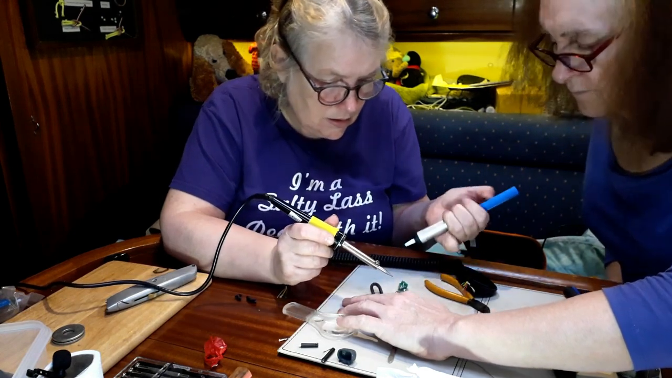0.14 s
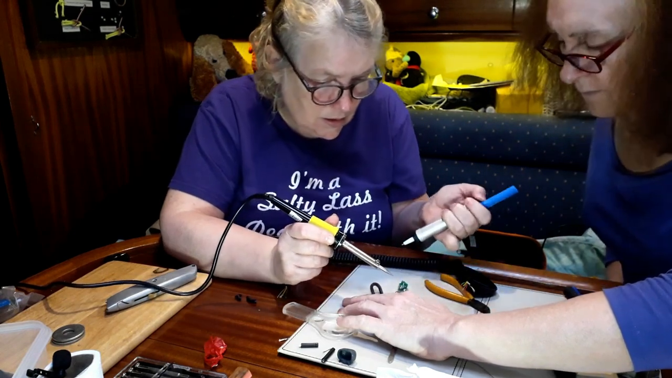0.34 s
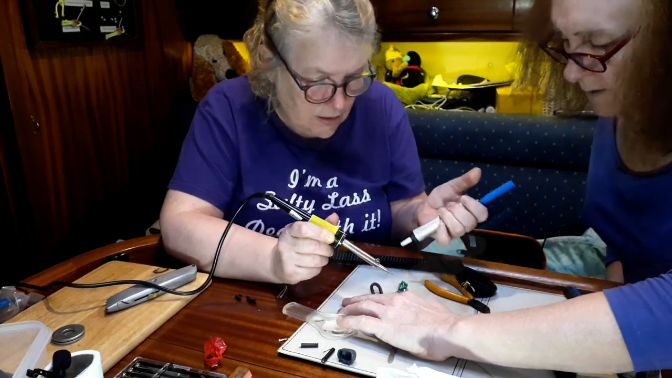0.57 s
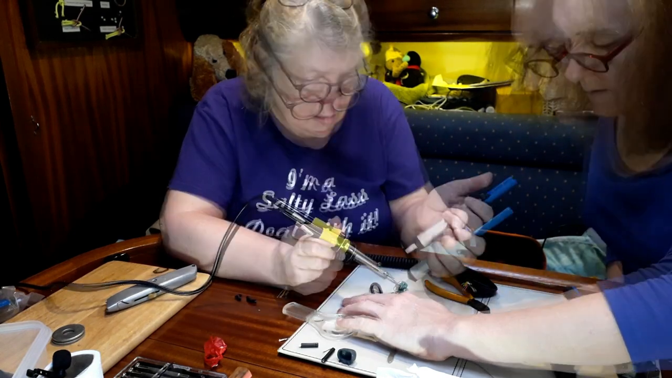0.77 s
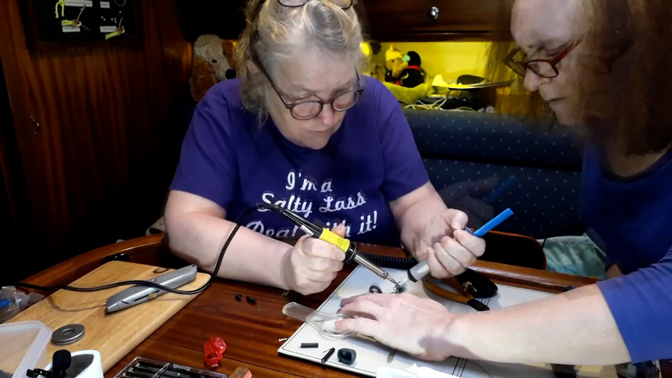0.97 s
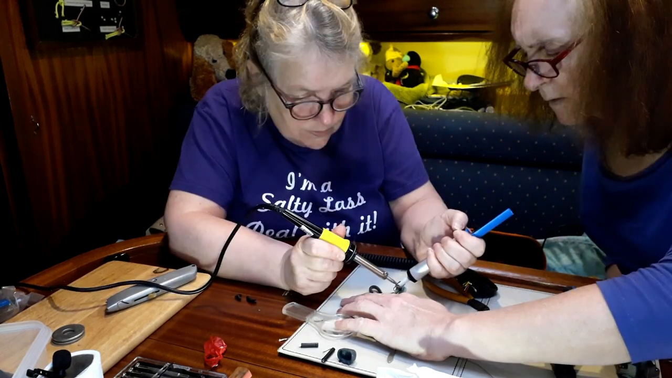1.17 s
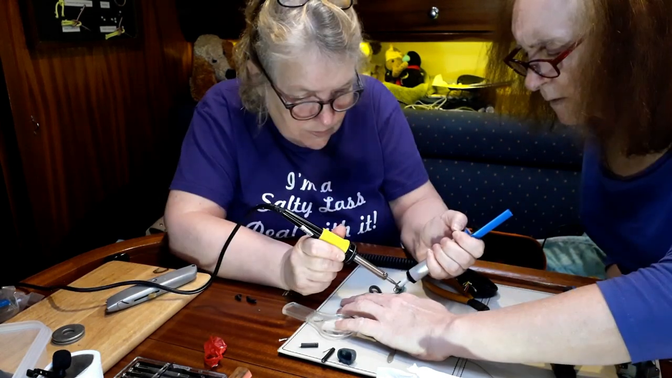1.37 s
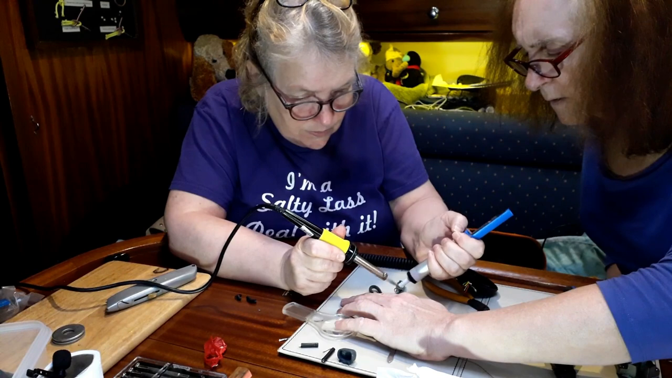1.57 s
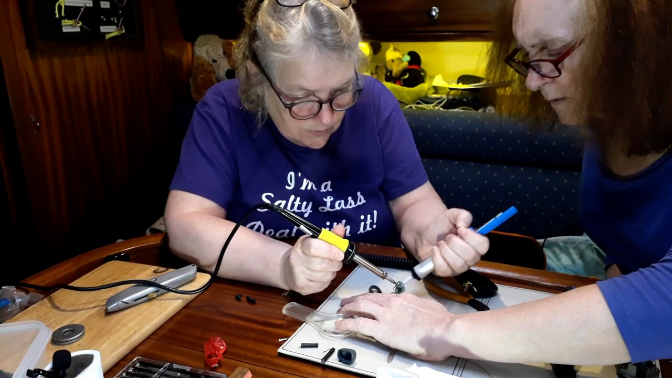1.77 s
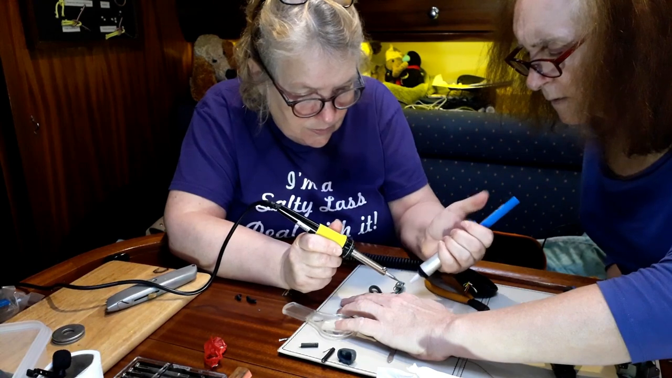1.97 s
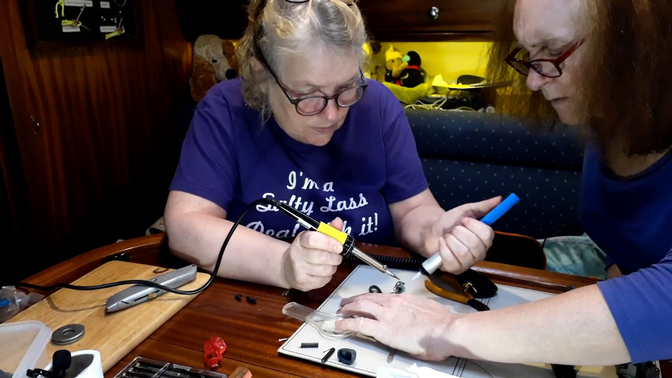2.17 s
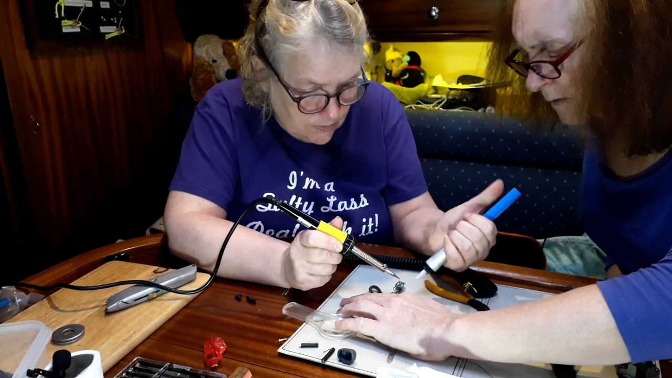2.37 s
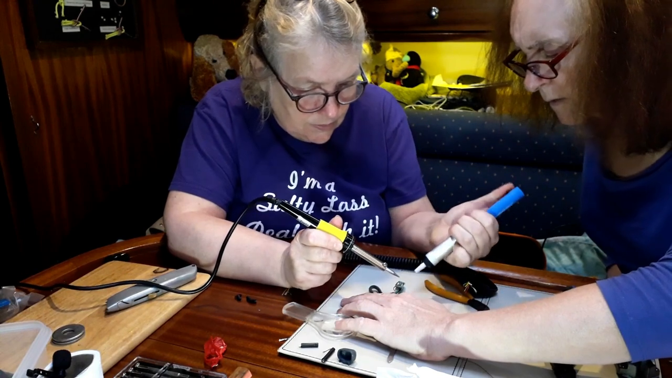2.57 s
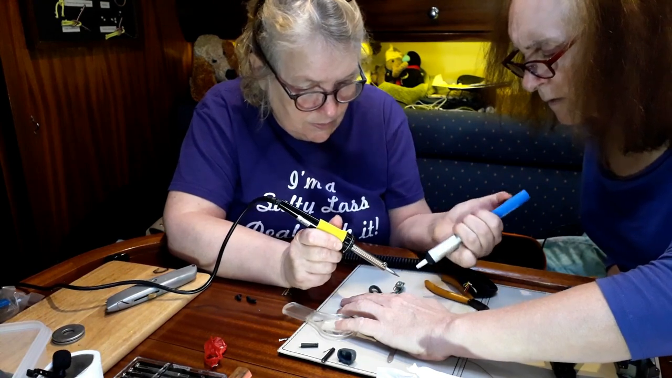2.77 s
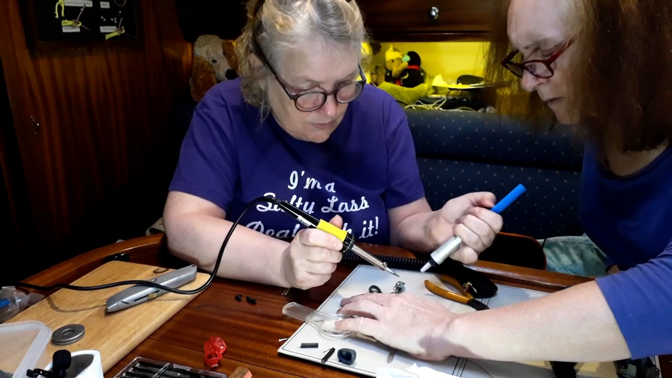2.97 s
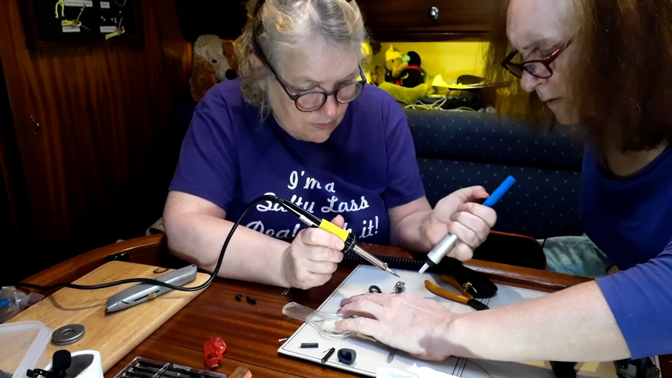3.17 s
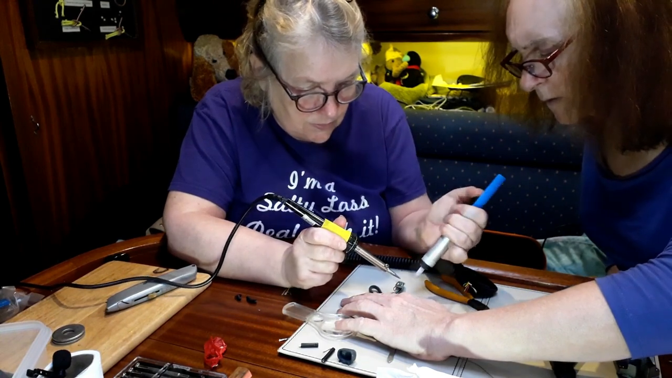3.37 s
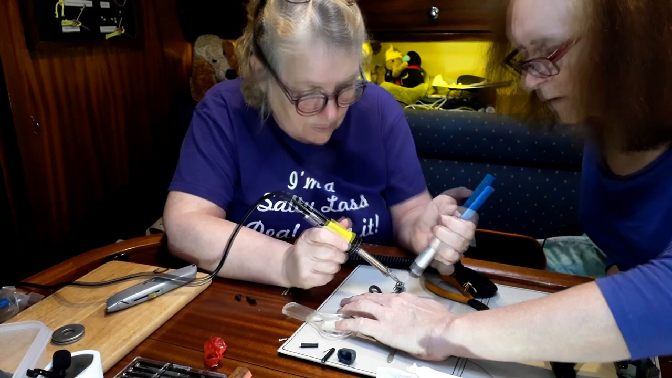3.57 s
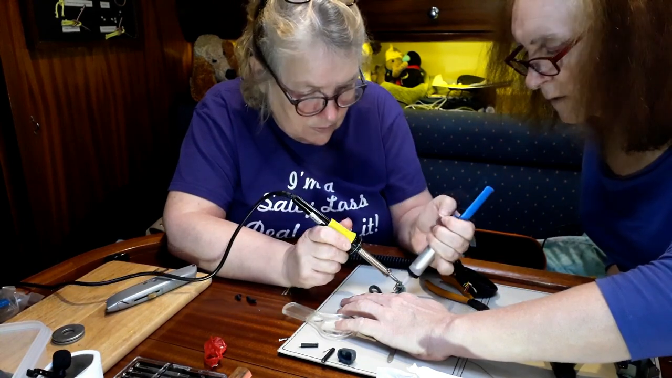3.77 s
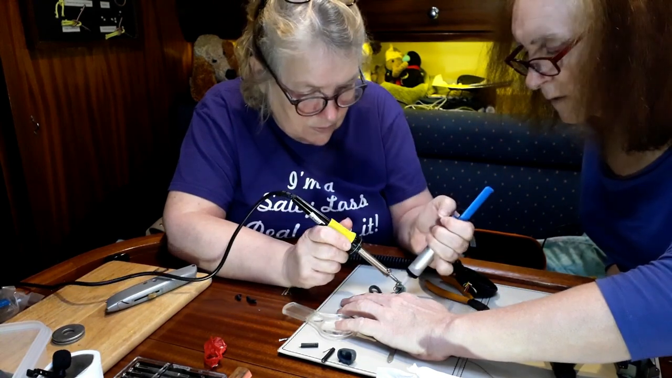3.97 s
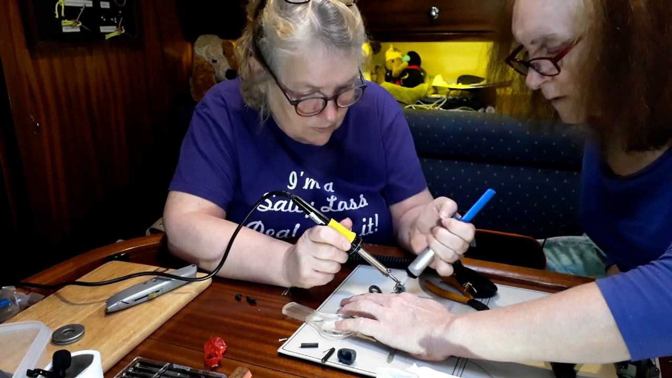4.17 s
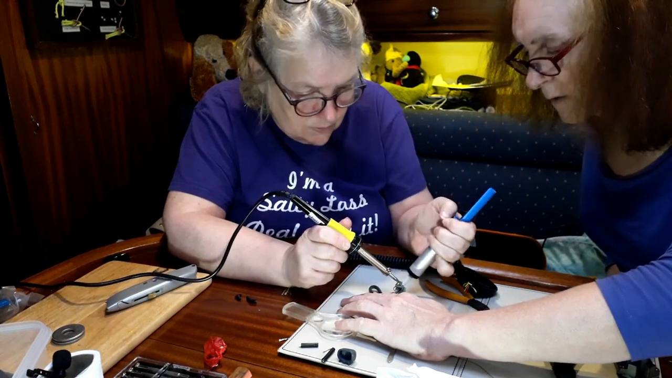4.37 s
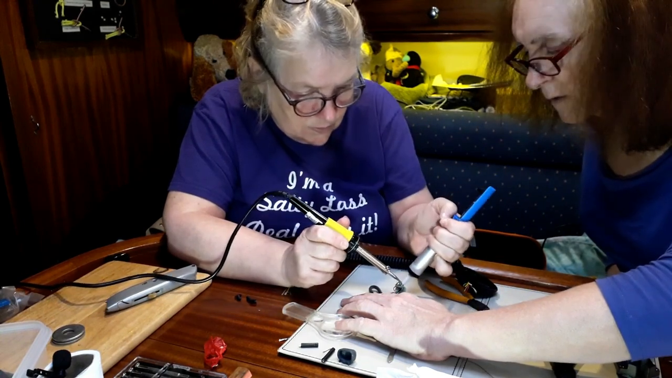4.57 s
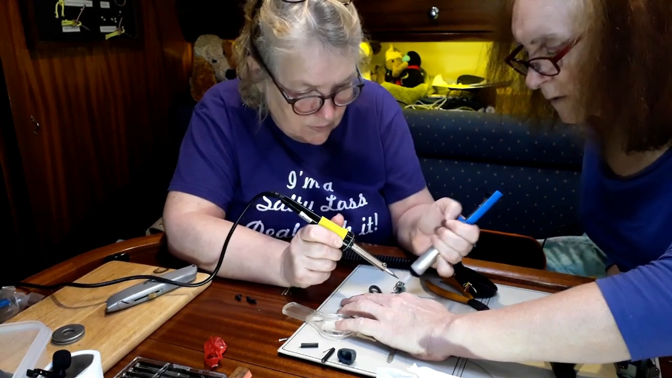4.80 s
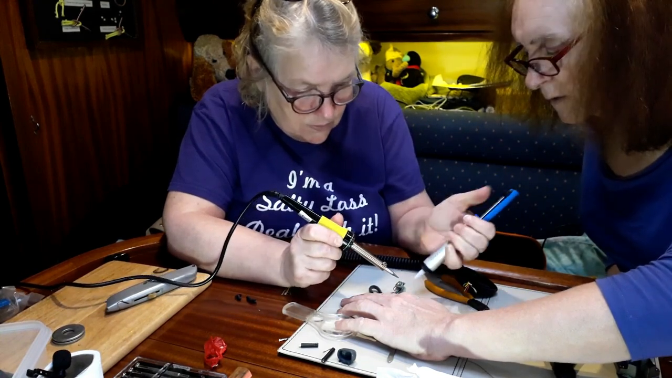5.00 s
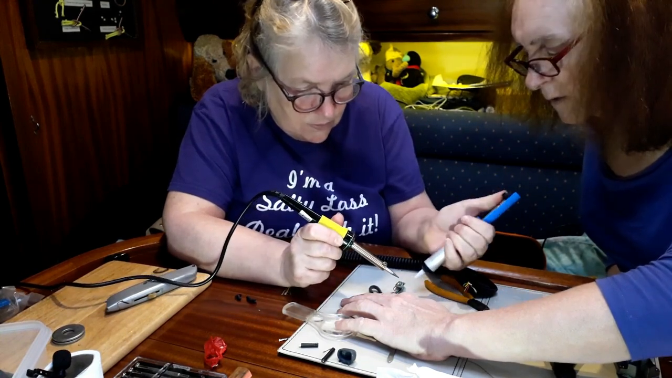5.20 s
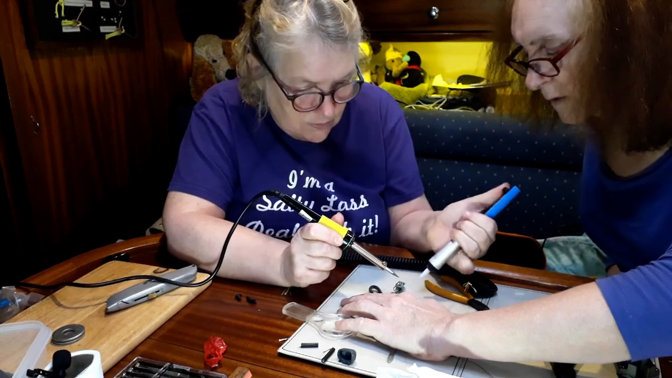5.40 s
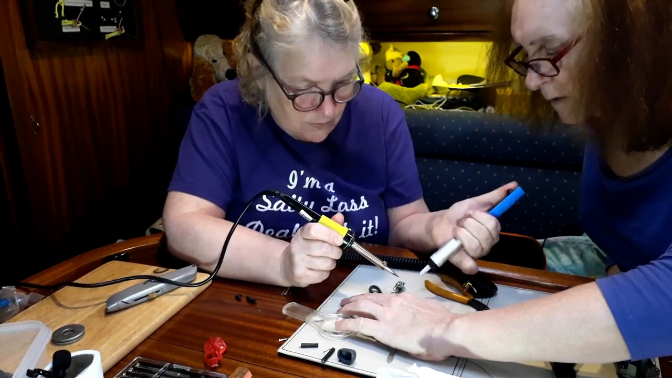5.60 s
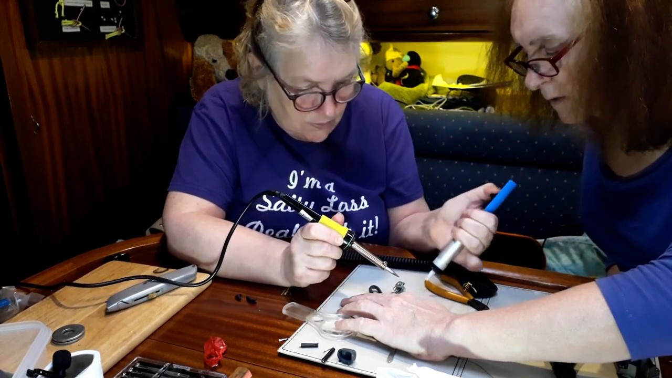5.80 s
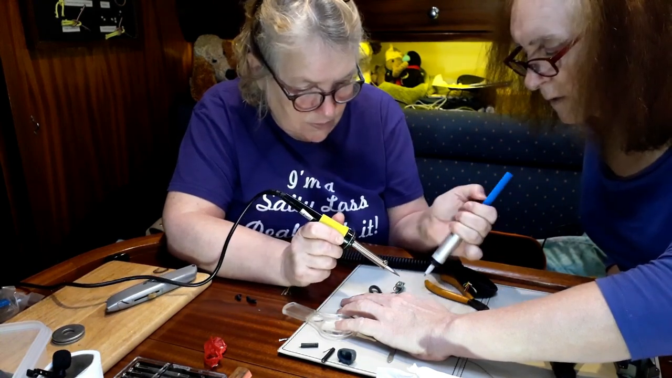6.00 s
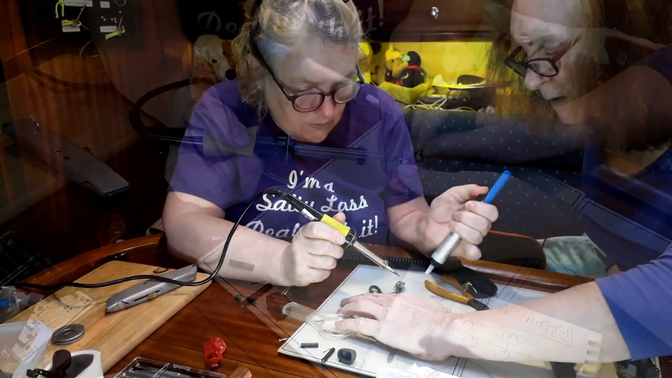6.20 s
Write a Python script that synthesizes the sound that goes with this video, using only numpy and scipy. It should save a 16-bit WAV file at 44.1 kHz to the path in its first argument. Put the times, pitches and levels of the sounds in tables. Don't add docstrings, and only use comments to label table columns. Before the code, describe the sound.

Very close stereo sound in a small wooden cabin, with short tight reflections. Faint low hum, soft cloth rustle and gently shifting hiss run throughout. It opens with a plunger already rubbing down its barrel; at 0.2 s it latches with a loud bright click, a lighter click follows at 0.3, and the knob clacks back at 0.43. Faint metal ticks come around 0.7-0.9. At 1.6 the piston releases in a hard snap, rattling briefly while the spring shivers away. Small ticks and scrapes gather from 2.2, with a clear sharp tick at 2.7. A lighter, squeakier slide begins at 2.75, latching at 3.0, with the knob returning at 3.2. A second, harder snap bursts at 4.46 with a quieter spring tail. Sparse faint ticks lead to a firmer slide at 5.73, the strong latch at 5.98 and a final knob clack at 6.2.

```python
import sys
import numpy as np
from scipy import signal
from scipy.fft import rfft, irfft
from scipy.io import wavfile
from scipy.ndimage import uniform_filter1d

SR = 44100
rng = np.random.default_rng(int(sys.argv[2]) if len(sys.argv) > 2 else 0)


def makeup_ratio(level_db):
    decades = np.asarray(level_db, float) / 20
    return 10 ** decades


def store_pcm(level_fs):
    pcm = np.round(np.clip(level_fs, -1, 1) * 32767).astype(np.int16)
    wavfile.write(sys.argv[1], SR, np.atleast_2d(pcm).T)


N = 275625
SPAN = 12000


def highpass(x, hz, order=2):
    return signal.sosfilt(signal.butter(order, hz, "high", fs=SR, output="sos"), x)


def decay(t, t60):
    return np.exp(-np.log(1000) * t / t60)


def gain_on(points, size, tilt_db=0.):
    hz = np.maximum(np.arange(size // 2 + 1) * SR / size, 10.)
    f, db = np.transpose(points)
    return np.log(makeup_ratio(np.interp(np.log(hz), np.log(f), db) + tilt_db * np.log2(hz / 3000)))


def causal(log_gain):
    cepstrum = irfft(log_gain)
    half = len(cepstrum) // 2
    cepstrum[1:half] *= 2
    cepstrum[half + 1:] = 0
    return irfft(np.exp(rfft(cepstrum)))


def unit(x):
    return x / np.sqrt(np.mean(x ** 2))


def noise(points):
    spectrum = rfft(rng.standard_normal(N + 1)) * np.exp(gain_on(points, N + 1))
    return unit(irfft(spectrum, N + 1)[:N])


def walk(rate):
    k = int(SR / rate)
    return unit(uniform_filter1d(uniform_filter1d(rng.standard_normal(N), k), k))


def even(x, size):
    colour = uniform_filter1d(np.abs(rfft(x)), size)
    return signal.fftconvolve(x, causal(-np.log(colour))[:len(x) // 4])[:len(x)]


# pitch_hz, level_db [per Hz]
HUM = [(12, -44), (20, -12), (32, -9.5), (81, -4), (157, 2), (188, -3), (223, -2), (250, -9), (356, -23),
       (380, -18), (450, -18), (580, -50.5), (990, -120)]
# pitch_hz, level_db [per Hz]
RUSTLE = [(150, -28.5), (250, -4), (354, -2.5), (530, -5), (630, -5.5), (820, -4), (1070, -17), (1800, -21),
          (2500, -18.5), (3250, -43), (5500, -120)]
# pitch_hz, level_db [per Hz]
HISS = [(710, -36.5), (1200, -4), (1320, -11.5), (1780, -2), (2530, -8), (3520, -2.5), (5450, 0.5),
        (15100, -2.5), (16000, -4.5), (16500, -30)]
# pitch_hz, level_db [per Hz]
AROUND = [(15, -37), (25, -3.5), (206, -2), (439, -5), (818, -9), (1370, -9.5), (2000, -10), (2350, -9.5),
          (5000, -6), (7920, -8), (14800, -8.5), (16000, -14)]
# time_s, level_db
GAIN = [(0, -66), (.6, -65.5), (1.04, -66), (1.1, -69.5), (1.55, -69.5), (1.8, -69), (1.95, -73),
        (2.64, -72.5), (2.75, -66.5), (3.15, -68), (3.41, -66), (3.83, -67), (3.88, -70), (4.7, -70),
        (4.92, -73), (5.67, -71.5), (6.1, -67.5), (6.25, -67.5)]
# middle_s, length_s, hum_db, rustle_db [swell]
STIRS = [(0.409, .4, -4.5, 3.5), (0.793, 0.35, -1.5, 8), (1.85, .3, -1.45, 7), (2.348, 0.49, 5, 5),
         (2.62, 0.22, -6.5, -4), (3.64, 0.1, 3, -3.7), (4.501, .5, 4, 2.5), (5.197, 0.38, 2, 0.6),
         (5.5, .15, -2.5, -1.2), (6.048, 0.5, 0, 2.5)]
HUM_DB, RUSTLE_DB = 1.5, -9.5


def cabin():
    t = np.arange(N) / SR
    hiss_db = np.interp(t, *np.transpose(GAIN))
    swell_db = np.zeros((2, N))
    for middle_s, length_s, *stir_db in STIRS:
        swell_db += np.outer(stir_db, np.exp(-(2 * (t - middle_s) / length_s) ** 2))
    hum = noise(HUM) * makeup_ratio(hiss_db + HUM_DB + swell_db[0] + 1.2 * walk(8))
    rustle = noise(RUSTLE) * makeup_ratio(hiss_db + RUSTLE_DB + swell_db[1] + 1.2 * walk(9))
    hiss = noise(HISS) * makeup_ratio(hiss_db - 2.3)
    return hum + rustle + hiss, noise(AROUND) * makeup_ratio(hiss_db - 6.0)


# delay_ms, level_db
ECHOES = [(2.1, -11), (5.6, -8), (9.5, -12.5), (14, -21.5)]
ROOM_T60_S, ROOM_DB = 0.085, 0.63
LATE_T60_S, LATE_DB = 0.31, -31.5


def room():
    t = np.arange(SPAN) / SR
    fade = decay(t, ROOM_T60_S) + makeup_ratio(LATE_DB) * decay(t, LATE_T60_S)
    tail = rng.standard_normal(SPAN) * (1 - np.exp(-t / 0.00047)) * fade
    path = makeup_ratio(ROOM_DB) * tail / np.sqrt(np.sum(tail ** 2))
    path[0] += 1
    echoes = np.zeros(SPAN)
    for delay_ms, db in ECHOES:
        echoes[int(delay_ms * SR / 1000)] = makeup_ratio(db)
    return even(path, size=16) + highpass(echoes, 900)


# start_s [slide], latch_s, latch_db, back_s [knob returns], back_db
STROKES = [
    (-.06, 0.2162, -5, .428, -14.5),
    (2.755, 2.9774, -3.5, 3.2042, -14),
    (5.732, 5.980, 0, 6.1998, -10),
]
# rub_db, squeak_db [bright part over the rub]
RUB_DB = [
    (-56, -6),
    (-58.5, -1.5),
    (-54, -7),
]
# pitch_hz, level_db [per Hz]
RUB = [(600, -39.5), (1100, -18), (1900, -7), (2500, -2.5), (3200, 4.2), (3900, 2), (4600, -7), (5200, 1.9),
       (6200, -8), (9000, -14.5), (12000, -26), (16000, -37.5)]
SLIDE_IN_S, SLIDE_IN_DB, EARLY_DB = 0.055, -10.5, -3
EASE_S, EASE_DB = .105, -5
COLUMN_DB, COLUMN_DB_PER_S = -64.5, 53.5
PATCHY_DB = 1.5


def slides(path):
    t = np.arange(N) / SR
    grain_db = 3.4 * np.minimum(rng.exponential(size=N), 7) + 1.2 * walk(60)
    grains = rng.standard_normal(N) * makeup_ratio(grain_db)
    seal = irfft(rfft(grains, N + 1) * np.exp(gain_on(RUB, N + 1)))[:N]
    edges_hz = (1000, 2600, 4400, 6000, 16000)
    rub = np.zeros(N)
    for band in zip(edges_hz, edges_hz[1:]):
        part = signal.sosfilt(signal.butter(2, band, "band", fs=SR, output="sos"), seal)
        rub += makeup_ratio(PATCHY_DB * walk(22)) * part
    rub = signal.fftconvolve(rub, path)[:N]
    squeak = unit(highpass(rub, 4800))
    rub = unit(rub)
    column = noise([(400, -22.5), (650, -5), (760, 3.0), (880, -4.5), (1300, -37.0)]) * makeup_ratio(4.2 * walk(40))
    out = np.zeros(N)
    for (start, end, *_), (force_db, squeak_db) in zip(STROKES, RUB_DB):
        on = uniform_filter1d(1. * (t >= start) * (t <= end), 300)
        bends_s = [start, start + SLIDE_IN_S, end - EASE_S, end]
        rub_db = force_db + np.interp(t, bends_s, [SLIDE_IN_DB, EARLY_DB, 0, EASE_DB])
        column_db = COLUMN_DB + COLUMN_DB_PER_S * np.clip(t - end, -1, 0)
        out += on * ((rub + makeup_ratio(squeak_db) * squeak) * makeup_ratio(rub_db) + column * makeup_ratio(column_db))
    return out


GRIP_S, LOOSE_GRIP_S = 0.038, .014
OWN_T60_S = .007


def blows(events, modes, crack, grip_s, direct_db, paths):
    out, t = np.zeros(N + SPAN), np.arange(2048) / SR
    grit = rng.standard_normal((len(events), 2048))
    luck = rng.standard_normal((len(events), 2, len(modes) + 1))
    for event, rough, chance, path in zip(events, grit, luck, paths * len(events)):
        s, db, contact_ms, tilt_db, ring_db, *own = event
        own_mode = [(*own, OWN_T60_S)] if own else []
        hz, mode_db, t60 = np.transpose(modes + own_mode)
        size_luck, pitch_luck = chance[:, :len(hz)]
        push = even(rough * np.exp(-t * 1000 / max(contact_ms, .05)), size=9)
        sizes = makeup_ratio(mode_db + 1.4 * size_luck + tilt_db * np.log2(hz / 3000))
        fade = decay(t, np.minimum(2.1 * t60, grip_s)[:, None])
        ring = sizes @ (np.sin(2 * np.pi * np.outer(hz * (1 + .01 * pitch_luck), t)) * fade)
        body = makeup_ratio(ring_db) * unit(ring) + unit(causal(gain_on(crack, 2048, tilt_db)))
        way = np.append(path[0] * makeup_ratio(direct_db), path[1:])
        heard = signal.fftconvolve(signal.fftconvolve(body, push), way)[:SPAN]
        at = int(s * SR)
        out[at:at + SPAN] += heard * makeup_ratio(db) / np.abs(heard).max()
    return out[:N]


def touched(rows, touch):
    return [(s, db, *touch, *own) for s, db, *own in rows]


# start_s, level_db [peak]
POPS = [
    (.172, -43),
    (.293, -34),
    (4.598, -46),
    (5.92, -47),
]
# pitch_hz, level_db, t60_s
AIR = [(403, 4.5, 0.11), (760, -1, 0.033), (1300, -10.5, .04)]
# pitch_hz, level_db [per Hz]
AIR_CRACK = [(40, -55), (150, -32.5), (300, -18), (700, 3.5), (1100, -10.5), (2500, -13.5), (5000, -20),
             (16000, -56)]
LATCH_POP_DB, SETTLE_S, SETTLE_DB = -27, .055, -29.5


def air_pops(paths):
    rows = list(POPS)
    for _, latch_s, latch_db, *_ in STROKES:
        rows += [(latch_s, latch_db + LATCH_POP_DB), (latch_s + SETTLE_S, SETTLE_DB)]
    return blows(touched(rows, (0.28, 0.1, -4)), AIR, AIR_CRACK, GRIP_S, 0.3, paths)


# start_s, level_db [peak]
KNOCKS = [
    (2.386, -63),
    (5.73, -66),
]
# pitch_hz, level_db, t60_s
CAP = [(180, -50, 0.13), (253.1, -5, 0.092), (440, -7, 0.027), (730.4, 3, .09)]
# pitch_hz, level_db [per Hz]
CAP_CRACK = [(40, -23), (130, -16), (190, -29), (300, -13), (500, -25.5), (740, -0.5), (1000, -24.5),
             (2500, -27), (16000, -43)]
CAP_LAG_S, CAP_DB = .009, -7.5


def cap_knocks(paths):
    rows = list(KNOCKS)
    rows += [(back_s + CAP_LAG_S, back_db + CAP_DB) for *_, back_s, back_db in STROKES]
    return blows(touched(rows, (1.23, 0.32, 4.6)), CAP, CAP_CRACK, GRIP_S, 3, paths)


# start_s, level_db [peak], pitch_hz, strength_db [of that pitch]
SCRAPES = [(.7819, -48.5, 3440, 18), (.8016, -49, 3470, 18), (2.2544, -48, 3060, 22),
           (2.3824, -43.5, 3200, 10), (2.3915, -39, 2130, 5.2), (2.8409, -35, 3630, 6),
           (2.8734, -30.5, 4600, 8), (4.794, -53.5, 2370, 12), (4.81, -47, 2100, 17),
           (5.3123, -55, 3100, 16), (5.9349, -41, 2510, 9)]
# pitch_hz, level_db, t60_s
PIN = [(1957, -2, .05), (2800, -63, 0.17), (3580, 0.5, 0.037), (5000, 8, 0.018), (7050, -27, 0.037)]
# pitch_hz, level_db [per Hz]
PIN_CRACK = [(180, -18.5), (300, 0), (558, -17.5), (767, 3), (1380, -30.5), (2840, 5), (4690, 0.5),
             (6240, 0), (13500, -12), (15700, -48), (16500, -33)]


def pin_scrapes(paths):
    return blows(touched(SCRAPES, (3.8, -0.5, 0.55)), PIN, PIN_CRACK, LOOSE_GRIP_S, 1.5, paths)


# start_s, level_db [peak], pitch_hz, strength_db [of that pitch]
TICKS = [(.677, -46, 6940, 7.5), (.9345, -45, 4720, 22.5), (2.2152, -43.5, 5000, 22.5),
         (2.239, -38.5, 5000, 15), (2.2505, -35.5, 4970, 9), (2.5372, -31, 5150, 15),
         (2.675, -55, 5000, 20), (2.717, -16.5, 5263, 6.5), (4.8122, -39.5, 5260, 20.5),
         (5.3125, -40, 5000, 18), (5.5, -49.5, 6700, 6), (5.73, -44, 5150, 22)]
# pitch_hz, level_db, t60_s
TIP = [(3280, -6.5, 0.24), (6050, -24, 0.028), (6820, -2, .07), (8440, -4.5, 0.025)]
# pitch_hz, level_db [per Hz]
TIP_CRACK = [(300, -56), (1000, -22), (2500, -13.5), (3300, 6), (4200, -15.5), (5200, 8.5), (6500, -18.5),
             (9000, -13), (13000, -23.5), (16000, -38)]
GRAZE_LEAD_S, GRAZE_DB, GRAZE_MS, GRAZE_HZ, GRAZE_RING_DB = .011, -46, 1.4, 5200, 7
TIP_DIRECT_DB = 2.5


def tip_ticks(paths):
    rows = touched(TICKS, (0.15, 0.053, 2))
    for *_, back_s, _ in STROKES:
        rows.append((back_s - GRAZE_LEAD_S, GRAZE_DB, GRAZE_MS, 0.1, GRAZE_RING_DB, GRAZE_HZ, 20))
    return blows(rows, TIP, TIP_CRACK, LOOSE_GRIP_S, TIP_DIRECT_DB, paths)


# pitch_hz, level_db, t60_s
KNOB = [(2925, -24.5, .06), (3480, -27, .06), (3660, 4.5, .08), (3707, -0.5, .08), (3823, 1.5, .08),
        (5190, 1, .05), (6700, -39.5, .04), (8070, -0.5, .04), (9600, -47.5, .04)]
# pitch_hz, level_db [per Hz]
KNOB_CRACK = [(290, -58.5), (500, -39), (1980, -28.5), (2690, -4), (3550, 0.5), (4360, -15.5), (6860, -7.5),
              (7820, -16.5), (9740, -14), (14000, -31), (16500, -58)]
KNOB_TAPS = [(0.4265, -27.5), (3.3505, -58.5)]


def knob_returns(paths):
    rows = KNOB_TAPS + [(back_s, back_db) for *_, back_s, back_db in STROKES]
    return blows(touched(rows, (7.7, -0.092, -5)), KNOB, KNOB_CRACK, LOOSE_GRIP_S, 0.3, paths)


# pitch_hz, level_db, t60_s
CATCH = [(2907, -19, 0.061), (3230, -10, 0.21), (3040, -21.5, .08), (3530, -3, 0.21), (3900, 8.5, .08),
         (3680, 7.5, .08), (3907, 11.5, 0.24), (5200, -23, 0.059), (6700, 4.5, 0.15), (8700, 8, .04),
         (9760, -0.5, 0.059)]
# pitch_hz, level_db [per Hz]
CATCH_CRACK = [(180, -58), (300, -29.5), (539, -25.5), (730, -15), (1630, -34.5), (2100, -9.5), (3710, -1),
               (5460, -10.5), (7500, -10.5), (9330, -7), (10700, -29), (15200, -30), (16500, -60.5)]
PAWL_DROPS = [(.2945, -24)]  # start_s, level_db
PAWL_LEAD_S, PAWL_DB = .0019, -17.5


def catch_latches(paths):
    rows = list(PAWL_DROPS)
    for _, latch_s, latch_db, *_ in STROKES:
        rows += [(latch_s - PAWL_LEAD_S, latch_db + PAWL_DB), (latch_s, latch_db)]
    return blows(touched(rows, (1, 0.14, -5.5)), CATCH, CATCH_CRACK, GRIP_S, 0.3, paths)


# start_s, level_db [blow], rattle_db, tilt_db [per octave]
SNAPS = [
    (1.5983, -0.5, -3, 0),
    (4.4621, 1.5, -6, 0.4),
]
# pitch_hz, level_db, t60_s
SPRING = [(3500, -41, .3), (5180, -40, .28), (6500, -46, .2), (7200, -38, .3)]


def spring():
    out, t = np.zeros(N), np.arange(SPAN) / SR
    for (s, *_), shake_db in zip(SNAPS, (0.1, -13.0)):
        at = int(s * SR)
        for hz, db, t60 in SPRING:
            waver = uniform_filter1d(rng.standard_normal((2, SPAN)), size=230, axis=1)
            phase = 2 * np.pi * hz * t
            tone = unit(waver[0] * np.cos(phase) + waver[1] * np.sin(phase))
            out[at:at + SPAN] += makeup_ratio(db + shake_db) * tone * decay(t, t60)
    return out


# pitch_hz, level_db, t60_s
BARREL = [(171, 3, 0.11), (422, -3, 0.085), (1340, -10, 0.1), (1460, -17.5, 0.057), (2047, -0.5, 0.28),
          (2565, -2.5, 0.04), (2283, 0.5, 0.16), (3380, -10.5, 0.096), (2926, -4.5, 0.11), (3960, -9, 0.33),
          (4930, -2, 0.18), (5200, -2.5, 0.36), (6100, -11.5, 0.11), (6600, 0, 0.4), (8050, -21, 0.33),
          (8710, -6.5, 0.11), (8500, -9.5, 0.12), (9400, -17, 0.5), (9230, -4.5, 0.094), (9850, -6.5, 0.16),
          (10900, -12, 0.14), (11880, -15.5, 0.17), (11674, -27.5, 0.34), (704, -3, 0.08)]
# pitch_hz, level_db [per Hz]
BARREL_CRACK = [(24, -61), (40, -29.5), (186, 8.5), (523, -8.5), (823, 0.5), (981, -18.5), (1260, -8.5),
                (2970, -5.5), (3830, -21.5), (5050, -11.5), (11900, -23), (15300, -33.5), (16500, -47)]
SNAP_MS, SNAP_RING_DB = 2.9, -3.5
SLIP_GAP_S, LAST_SLIP_DB, SLIP_STEP_DB = .004, -16, -5.5
RATTLE_FIRST_S, RATTLE_SPREAD, RATTLE_DB_PER_S = .0055, 1.6, -460
RATTLE_MS, RATTLE_MS_PER_S, RATTLE_RING_DB = 2.8, 52, -1.5
RATTLE_TILT_DB, RATTLE_TILT_DB_PER_S = 1.27, 19.5


def piston(paths):
    rows = []
    for s, db, rattle_db, tilt_db in SNAPS:
        rows.append((s, db, SNAP_MS, tilt_db, SNAP_RING_DB))
        slips = [(s - (k + 1) * SLIP_GAP_S, LAST_SLIP_DB + k * SLIP_STEP_DB) for k in range(3)]
        rows += touched(slips, (4.6, -1, -6.5))
        for lag in RATTLE_FIRST_S * np.arange(1, 8) ** RATTLE_SPREAD:
            rows.append((s + lag, rattle_db + RATTLE_DB_PER_S * lag, RATTLE_MS + RATTLE_MS_PER_S * lag,
                         RATTLE_TILT_DB + RATTLE_TILT_DB_PER_S * lag, RATTLE_RING_DB))
    return blows(rows, BARREL, BARREL_CRACK, GRIP_S, 0.5, paths)


ASIDE_DB, ASIDE_HZ = -3, 8000


def treble_edges(bench):
    scatter = rng.standard_normal(400) * np.exp(-np.arange(400) / 90)
    aside = signal.fftconvolve(bench, scatter / np.sqrt(np.sum(scatter ** 2)))[:N]
    edge = uniform_filter1d(np.abs(aside), size=130)
    just_before = np.roll(uniform_filter1d(edge, size=400), 250)
    edge = np.clip(edge - 1.3 * just_before, 0, None)
    return makeup_ratio(ASIDE_DB) * edge / edge.max() * highpass(aside, ASIDE_HZ, order=4)


def scene():
    common, apart = cabin()
    paths = [room() for _ in range(7)]
    small = np.zeros(N)
    for k, part in enumerate((catch_latches, knob_returns, air_pops, cap_knocks, tip_ticks, pin_scrapes)):
        small += part(paths[k:] + paths[:k])
    hits = highpass(small, 170) + spring() + piston(paths)
    bench = highpass(hits, 100) + slides(paths[0])
    apart = apart + treble_edges(bench)
    return np.array([bench + common + apart, bench + common - apart])


def low_pass(x):
    return signal.sosfilt(signal.butter(12, 16660, fs=SR, output="sos"), x)


def record(dry):
    soft = np.tanh(.9 * dry) / .9
    mix = signal.sosfiltfilt(signal.butter(8, 16100, fs=SR, output="sos"), soft)
    return low_pass(mix)


dry = scene()
out = record(dry)
store_pcm(out)
```